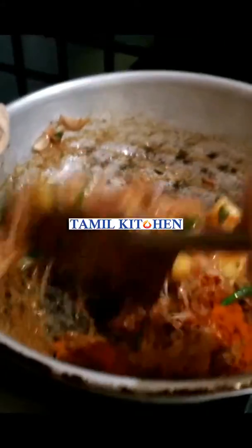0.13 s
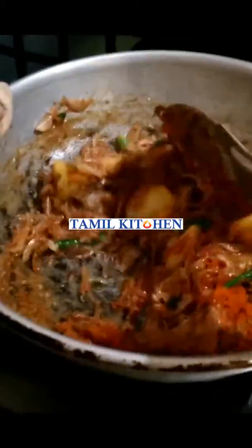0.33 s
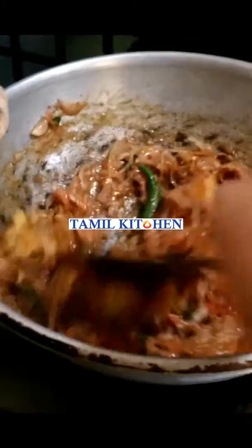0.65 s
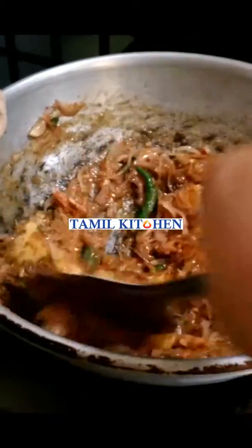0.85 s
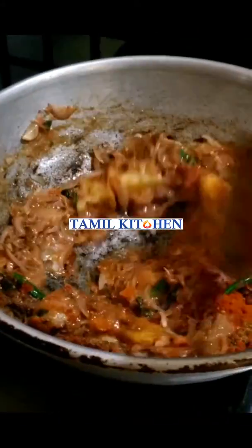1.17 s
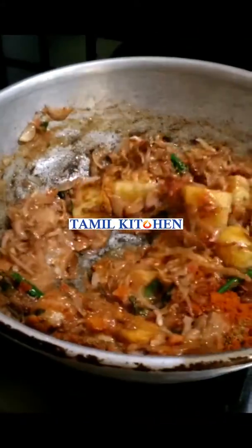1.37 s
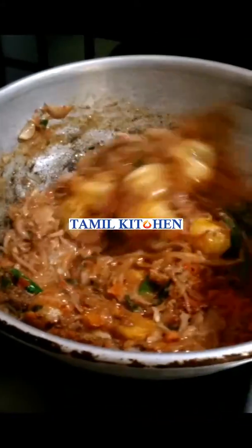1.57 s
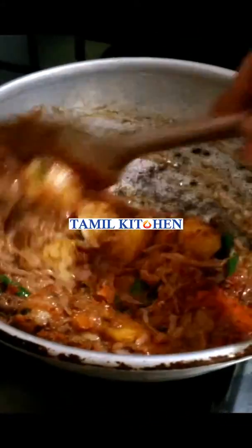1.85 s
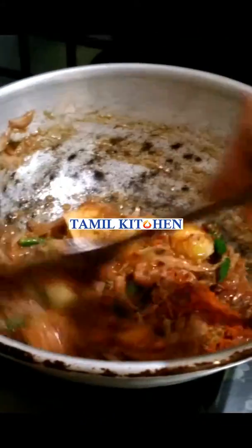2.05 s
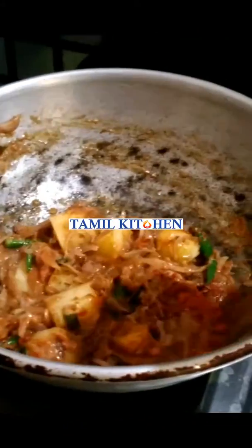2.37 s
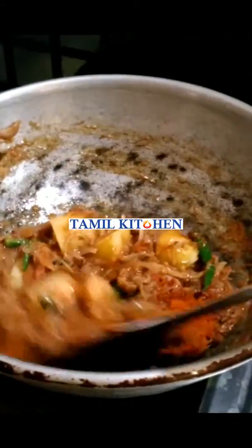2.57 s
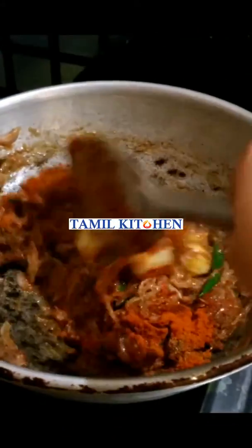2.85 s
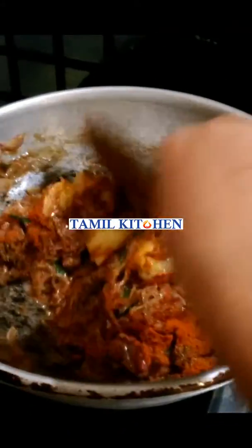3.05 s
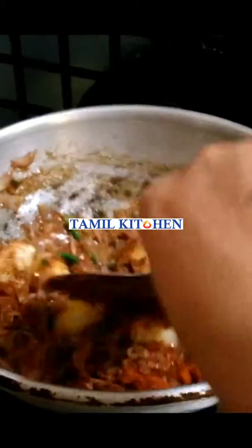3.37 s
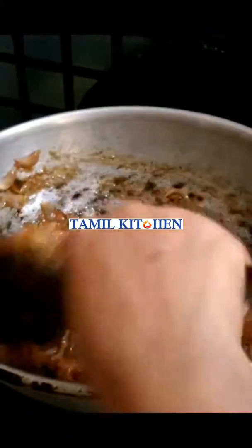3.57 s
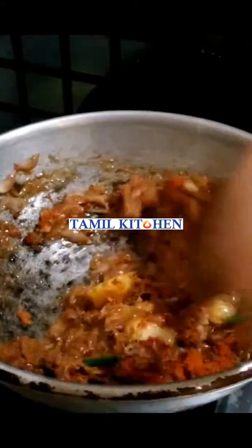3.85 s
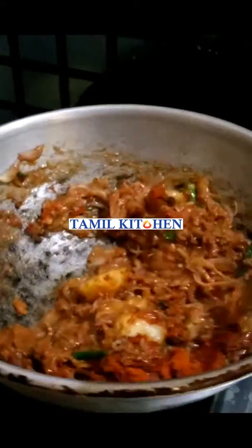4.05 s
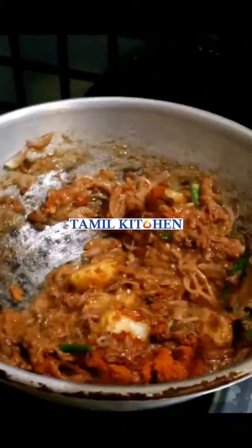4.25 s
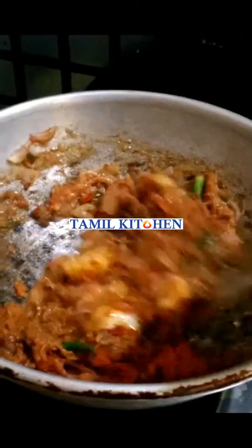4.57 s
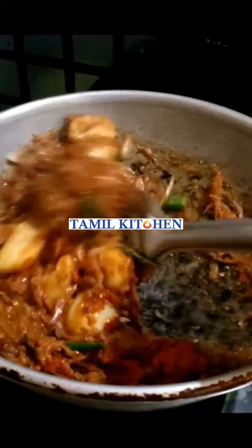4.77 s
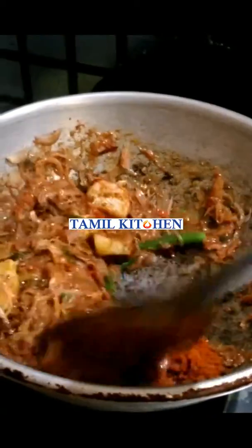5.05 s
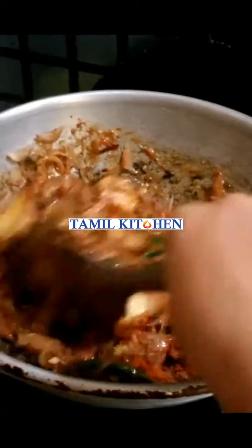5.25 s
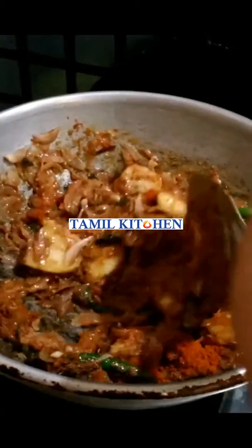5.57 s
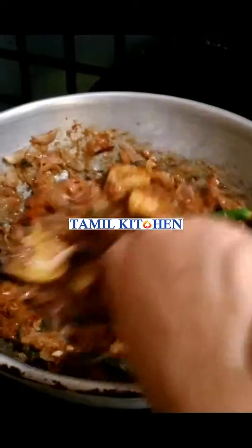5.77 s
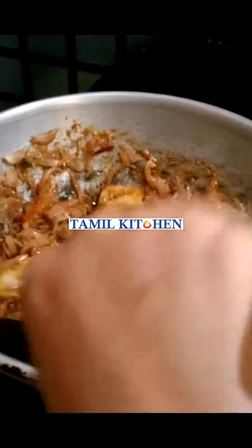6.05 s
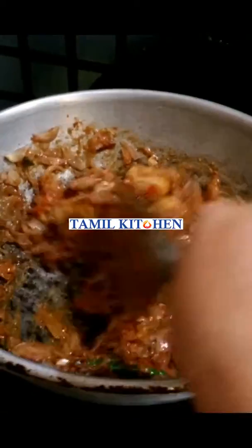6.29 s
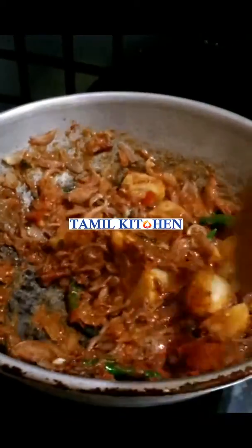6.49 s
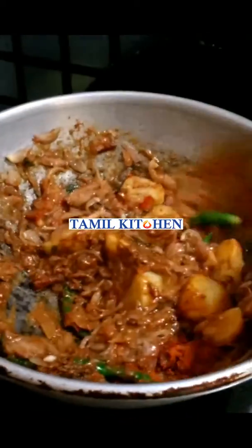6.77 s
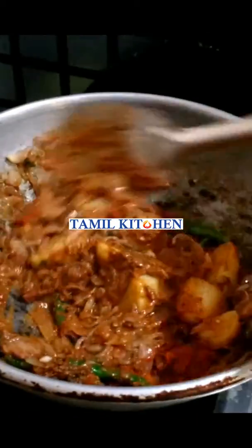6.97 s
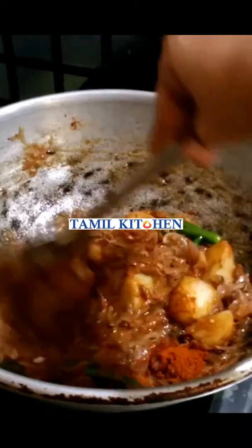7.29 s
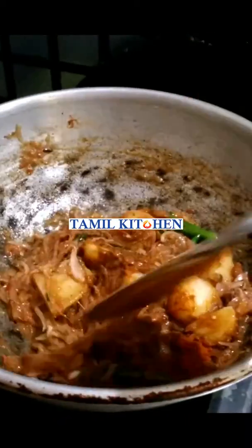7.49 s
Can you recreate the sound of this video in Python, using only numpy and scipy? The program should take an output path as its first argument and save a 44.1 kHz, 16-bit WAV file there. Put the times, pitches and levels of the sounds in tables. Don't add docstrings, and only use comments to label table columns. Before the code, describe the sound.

Close-up stirring of thick, sticky food with a metal ladle in a thin metal pan. Blows ring briefly, damped by the paste, each followed by a rasping drag and a dull shove. Pauses hold only tiny wet sounds and soft burner bumps over quiet room murmur. Later come a sharp knock, a bright cluster of scrapes and some soft thuds, with slight reverberation from hard kitchen walls.

```python
import sys
import numpy as np
from scipy import signal
from scipy.fft import rfft, irfft, next_fast_len
from scipy.io import wavfile
from scipy.ndimage import uniform_filter1d, map_coordinates

SR = 44100
rng = np.random.default_rng(int(sys.argv[2]) if len(sys.argv) > 2 else 0)


def level_to_linear(level):
    exponent = np.asarray(level, float) / 20
    return 10 ** exponent


def unload_wav(signal):
    wavfile.write(
        sys.argv[1],
        SR,
        np.round(np.clip(np.atleast_2d(signal).T, -1, 1) * 32767).astype(np.int16),
    )


N = 336483

# t/s, peak level/dB, bowl thud level/dB, brightest ring f/Hz, tick level/dB
KNOCKS = [(0.5226, -49.5, 16.5, 600, -34), (0.6338, -27, -5, 1130, -35), (0.971, -27, -26, 1850, -24.5),
          (1.01, -25, -15, 3400, -29.5), (1.366, -15.5, -16, 2460, -24.5), (1.3883, -11.5, -16, 2870, -32),
          (1.4208, -18.5, -8, 1120, -21.5), (1.735, -20, -25, 1490, -39), (1.7907, -27.5, -13, 2110, -20.5),
          (2.382, -14, -20, 2620, -27), (2.6436, -23, -23, 2560, -28), (3.1863, -46, -5, 1590, -26),
          (3.268, -43, -11, 1460, -37), (3.5605, -9.5, -18.5, 1470, -25), (4.1219, -17, -27, 2500, -32),
          (4.3449, -18, -12.5, 850, -58.5), (4.4096, -17.5, -10.5, 2340, -44),
          (4.581, -29.5, -12, 2520, -15), (5.036, -43.5, -22.5, 3430, -18.5), (5.356, -30, -12, 3670, -30),
          (5.9683, -36, -11, 900, -23), (6.688, -11.5, -14.5, 2710, -29.5),
          (6.995, -21.5, -34, 3240, -22.5), (7.0368, -15.5, -13.5, 2760, -38)]
# f/Hz, width/Hz, level/dB
BOWL_MODES = [(189, 14, -16), (285.7, 17.5, -3), (343, 16, 0.5), (380, 17, -3.5), (459.5, 40, -2.5),
              (501, 26, -6.5), (547, 59, -4), (634, 58, 1), (713.3, 36, 6), (780, 10.5, -8.5)]
WALL_MODES = [(908, 55, -8), (1017, 140, -8.5), (1099.4, 47, -7.5), (1233, 180, -5)]
RIM_MODES = [(1490, 47, -5.5), (1726, 190, 0), (2015, 94, -6), (2245, 170, -4.5), (2453, 86, -8.5),
             (2540, 9.1, -18.5), (2620, 68, -10.5), (2700, 40, -10.5), (2960, 76, -6.5), (3240, 140, -8),
             (3526, 41, -6), (3704, 44, -9), (4660, 71, -41.5)]
# f/Hz, level per Hz/dB
GRIT_SPECTRUM = [(71, -66.5), (120, -35), (175, -22.5), (295, -0.5), (340, 0.5), (423, -6), (619, -5.5),
                 (835, -12), (1080, -23.5), (1400, -15.5), (3250, 0), (4570, -22), (14300, -42.5)]
# t/s, time to lose 30 dB/s, level/dB, rim centre f/Hz, bare-metal hiss level/dB
DRAGS = [(.633, 0.19, -33.5, 2250, -27), (1.366, 0.2635, -26.5, 2650, -25), (2.382, 0.14, -33, 2700, -18.5),
         (2.63, 0.27, -47.5, 1690, -27), (3.269, 0.35, -60.5, 1500, -19),
         (3.56, 0.1444, -31.5, 1970, -15.5), (4.121, 0.23, -36, 2630, -18.5), (4.343, 0.17, -40, 1720, -46),
         (4.409, 0.2855, -33.5, 2520, -23), (5.969, 0.22, -53, 1600, -12), (6.688, 0.38, -32, 2570, -20.5)]
# peak t/s, fade/s, level/dB, rim centre f/Hz, bare-metal hiss level/dB
SWEEPS = [(.1, 0.19, -70, 1970, -6), (1.018, 0.21, -37, 3170, -14.5), (1.3, 0.4, -67, 2420, -19),
          (1.6, 0.34, -49, 2520, -18), (1.75, 0.3, -43, 1990, -13.5), (1.84, 0.29, -43.5, 2300, -23),
          (2.21, 0.35, -70, 1810, -25), (2.683, 0.22, -37.5, 2420, -14), (3.657, 0.15, -40.5, 3180, -9.5),
          (4.629, 0.25, -33.5, 2690, -17.5), (3.33, 0.18, -67, 2800, -28.5), (5.25, 0.2, -55, 2620, -30.5),
          (5.349, 0.14, -45.5, 3660, -15), (6.229, 0.1, -61.5, 2250, -25), (6.33, 0.56, -72, 2960, -17),
          (6.9, 0.64, -45.5, 2070, -11.5), (7.047, 0.24, -32.5, 3000, -19), (7.17, 0.17, -44.5, 2820, -7),
          (7.25, 0.09, -52.5, 1920, -12)]
# t/s, time to lose 30 dB/s, level/dB, bowl centre f/Hz
LOADS = [(0.521, 0.33, -41.5, 430), (0.635, 0.41, -33.5, 442), (1.37, 0.04, -37, 515),
         (2.38, 0.38, -39.5, 479), (3.269, .5, -52.5, 331), (3.56, 0.2356, -35.5, 430),
         (4.121, 0.34, -52, 354), (4.341, 0.12, -33, 550), (4.411, 0.37, -44.5, 496),
         (5.969, 0.29, -38, 490), (7.037, 0.67, -46, 330), (6.315, 0.7, -57, 373), (6.687, 0.5, -41, 605)]
# peak t/s, swell/s, fade/s, level/dB, bowl centre f/Hz
SHOVES = [(.1, 0.12, 0.89, -63, 508), (1.048, .12, 0.23, -33.5, 472), (1.66, 0.068, 0.43, -48, 496),
          (1.83, 0.17, 0.47, -43, 425), (1.95, 0.3, 0.2, -37.5, 462), (2.3, 0.068, 0.14, -59, 406),
          (2.78, 0.14, 0.16, -47.5, 595), (3.669, 0.13, 0.25, -37.5, 346), (3.9, 0.34, 0.64, -55.5, 295),
          (3.41, 0.25, 0.16, -53.5, 294), (4.325, .08, 0.091, -52, 600), (4.63, 0.086, 0.24, -44.5, 564),
          (4.74, 0.34, .17, -44, 585), (5.12, 0.36, 0.55, -61, 294), (5.365, 0.039, 0.25, -44.5, 414),
          (5.57, .2, 0.1, -62, 338), (6.64, 0.15, 0.12, -60, 390), (6.89, 0.26, 0.46, -46, 537),
          (7.11, 0.14, 0.37, -42.5, 620), (7.25, 0.39, 0.25, -35, 497), (7.5, 0.194, 0.15, -66.5, 327)]
# t/s, length/s, from f/Hz, to f/Hz, level/dB
GLIDES = [
    (0.043, 0.14, 1682, 2080, -55.5),
    (0.935, 0.083, 2100, 1510, -46),
    (1.266, 0.15, 2100, 1770, -57),
    (5.2295, 0.008, 3300, 2950, -38),
    (5.243, 0.016, 3100, 1900, -42),
    (6.198, 0.081, 1900, 1467, -63),
]
# t/s, length/s, f/Hz, width/Hz, level/dB
POCKETS = [(0.15, 0.078, 1390, 130, -71), (1.654, 0.042, 1300, 150, -39), (3.155, 0.086, 287, 37, -53.5),
           (3.24, 0.09, 282, 40, -51), (3.173, 0.052, 1590, 120, -59.5), (3.175, 0.15, 2800, 500, -61),
           (.944, .016, 2300, 1500, -44.5), (1.6, 0.0077, 1900, 1500, -42), (.1, 0.0137, 590, 390, -54),
           (5.235, 0.12, 2450, 1500, -50), (7.466, 0.042, 3700, 320, -69), (1.653, 0.055, 2720, 2060, -43),
           (1.727, 0.054, 2700, 3500, -57), (3.262, 0.06, 4700, 900, -63), (3.565, 0.15, 4000, 1600, -45),
           (6.768, 0.065, 5670, 770, -50.5), (6.96, 0.048, 2500, 3000, -47), (0.022, .04, 2600, 850, -61),
           (.17, .1, 3200, 500, -65), (.39, .02, 3000, 1500, -69), (.583, 0.012, 2600, 2100, -60),
           (1.24, 0.088, 3300, 1200, -68.5), (2.1, 0.099, 1100, 300, -67.5), (2.9, .14, 1710, 330, -67),
           (3.0, .06, 3600, 1200, -70.5), (3.325, .17, 2800, 900, -61), (3.81, 0.088, 1100, 370, -64.5),
           (5.04, .16, 2110, 420, -66), (5.887, .03, 2750, 2300, -63), (5.68, .2, 2500, 1400, -68),
           (5.9, 0.049, 550, 96, -65), (6.33, .11, 3100, 1100, -65), (2.02, .16, 2450, 400, -64),
           (6.05, .12, 2200, 1400, -60.5), (7.085, .17, 625, 40, -44), (7.095, 0.075, 1240, 220, -44),
           (1.5, .27, 650, 200, -48), (5.33, .15, 3100, 1300, -52), (5.345, .11, 640, 400, -52),
           (3.266, .22, 1250, 600, -56)]
# t/s, f/Hz,
# level/dB, t60/s
RINGS = [(.634, 1080, -35.5, 0.081), (.634, 3970, -38.5, .05), (1.366, 2490, -21, 0.22),
         (1.388, 2925, -30, 0.35), (1.421, 1093, -33.5, 0.12), (1.421, 3640, -29, .1),
         (1.43, 3280, -32, .15), (1.92, 377, -37, 0.21), (2.382, 2485, -30, .24), (2.382, 2600, -25, 0.056),
         (2.382, 3206, -30.5, 0.18), (2.382, 3486, -24, 0.11), (2.382, 1111, -31.5, 0.14),
         (2.382, 3750, -38.5, 0.23), (2.382, 2010, -38, .15), (2.382, 4167, -37, .08),
         (3.561, 1065, -26.5, 0.064), (3.561, 3740, -27, 0.055), (3.561, 1390, -25.5, 0.045),
         (3.561, 2306, -29, 0.067), (4.122, 2590, -29, 0.15), (4.122, 1150, -39, .2),
         (4.122, 3490, -37, 0.12), (4.345, 793, -33, 0.17), (4.41, 2390, -30, .08),
         (4.41, 3470, -32.5, .08), (6.689, 2923, -28, .22), (6.689, 2434, -32, 0.16),
         (6.689, 1905, -26, .07), (6.689, 3566, -30.5, 0.11), (7.036, 2680, -26.5, 0.053),
         (7.037, 3250, -29.5, .08), (.485, 600, -60, .05), (.523, 495, -33, .06), (1.02, 380, -36, .2),
         (1.791, 3600, -28, .02), (1.79, 5600, -46, .04), (1.94, 480, -33, .1), (4.345, 350, -33, .2),
         (4.345, 465, -35, .15), (4.345, 1800, -34, .1), (4.345, 2400, -36, .08), (5.357, 3500, -37, .06),
         (7.238, 474, -31, .12), (7.238, 362, -33, .12), (5.972, 385, -36, .2), (5.972, 780, -41, .2),
         (1.078, 640, -33, .06)]
# t/s, peak level/dB, f/Hz
NICKS = [(0.0276, -55, 2550), (0.0684, -47, 1750), (0.105, -43, 1900), (0.5821, -54, 900),
         (0.952, -41, 1780), (1.5996, -39, 3620), (1.7663, -30.5, 1400), (1.8506, -30, 1200),
         (1.9874, -30, 950), (2.0636, -43, 1080), (2.6325, -29, 1630), (3.3204, -42, 1460),
         (4.148, -27, 2520), (4.31, -40, 1140), (4.563, -29, 2500), (4.5908, -24, 3220),
         (4.6187, -31, 3280), (4.8, -35, 2120), (5.251, -37.5, 2090), (5.2752, -45, 2620),
         (5.889, -52.5, 1590), (5.9751, -32, 1118), (6.1374, -43.5, 2160), (6.217, -45, 2580),
         (6.6049, -50, 2320), (6.717, -29, 2970), (6.793, -23, 2660), (6.8568, -24, 1680),
         (6.9084, -41, 2700), (6.9703, -31, 2540), (7.223, -29, 1140), (1.405, -23, 3000),
         (1.449, -23, 2800), (1.75, -31, 2300), (1.815, -31, 3880), (1.853, -33, 2000), (4.504, -24, 2900),
         (4.665, -22, 2700), (5.305, -47, 2100), (6.748, -31, 2050), (7.049, -19, 2920), (7.077, -28, 3300),
         (7.098, -27, 3050), (7.12, -27, 3280)]
# t/s, peak level/dB, f/Hz
LUMPS = [(1.921, -27.5, 526), (2.001, -31.5, 796), (2.03, -39, 446), (2.085, -41, 430), (5.346, -44, 652),
         (5.386, -36.5, 340), (5.434, -41, 518), (6.357, -49, 497), (6.382, -42.5, 380),
         (6.425, -50.5, 416), (6.494, -50, 420), (7.104, -37, 640), (7.144, -32, 636), (7.187, -29, 610),
         (7.197, -26, 695), (7.249, -27, 558)]
# t/s, peak level/dB, f/Hz
BUMPS = [(.1, -60.5, 111), (.635, -38.5, 196.4), (1.221, -60, 128), (1.372, -46.5, 188), (2.28, -62, 95),
         (2.386, -47, 187), (2.828, -62, 91), (3.381, -56.5, 111), (3.432, -58, 134), (3.561, -49.5, 133),
         (3.92, -53.5, 100), (4.564, -53.5, 207), (5.02, -66.5, 78.6), (5.148, -57.5, 197.5),
         (5.545, -58, 160), (6.565, -59, 153), (6.634, -50, 182), (7.102, -48, 182), (7.471, -56, 187),
         (3.48, -57.5, 188), (3.925, -64, 60), (4.23, -66, 60)]
# f/Hz, t60/s
KITCHEN_T60 = [(200, 0.49), (1000, 0.48), (3000, 0.21), (8000, 0.46)]
# f/Hz, level per Hz/dB
AIR_SPECTRUM = [(15, -74.5), (25, -26), (92, -4.5), (123, -14), (161, 0), (239, -2.5), (296, -4),
                (418, -35), (590, -11.5), (903, -19), (1310, -21.5), (2540, -19), (5800, -29),
                (14300, -30.5)]
# f/Hz, level/dB
FRIDGE_HUM = [(100, -82.5), (194, -86.5)]
# f/Hz, level difference/dB
PAN_SHADE = [(60, 0.6), (110, 0.02), (200, -0.5), (370, 0.2), (680, 0.53), (1240, -5.0), (2270, -13.5),
             (4160, -15.0), (7620, -6.0), (14000, -5.0)]
AIR_SHADE = [(60, 5.5), (110, -1.5), (200, 0.5), (370, 0), (680, 3), (1240, -1), (2270, -9.5), (4160, 5),
             (7620, 1), (14000, -2)]
# f/Hz, coherence (held within 0-1)
PORT_LIKENESS = [(60, 0.83), (130, 0.86), (280, 0.88), (620, 0.54), (1350, -1.5), (2940, -0.21),
                 (6410, -0.33), (14000, -0.4)]

STEP = 32
LANDING_S, SWELL_SHARE = 0.004, 0.38
DRAG_ROUND, SWEEP_ROUND, LOAD_ROUND, SHOVE_ROUND = 1.19, 1.525, 0.94, 1.14
HISS_STEEP, WALL_STEEP = 1.01, 1.03
BOWL_REST_HZ, RIM_REST_HZ = 430, 2300
WALL_FROM_EDGE_DB, EDGE_DB_PER_OCT = -11, -16
WALL_FROM_BOWL_DB, BOWL_DB_PER_OCT = -16.5, 14.5
GLIDE_WIDTH = 0.28
NICK_DB, NICK_CYCLES, NICK_GRIT_DB = -3.5, 43, -14
LUMP_CYCLES = 24
RING_ROUGH, RING_FLUTTER_DB = 1.2, 4
TOP_HZ = 14300


def scrape():
    drag, sweep, load, shove = [np.transpose(rows) for rows in (DRAGS, SWEEPS, LOADS, SHOVES)]
    landing = LANDING_S + 0 * drag[0]
    sweep_swell = SWELL_SHARE * sweep[1]
    edge = np.vstack([loss_db(drag[0], landing, drag[1], DRAG_ROUND),
                      loss_db(sweep[0], sweep_swell, sweep[1], SWEEP_ROUND)])
    heap = np.vstack([loss_db(load[0], LANDING_S + 0 * load[0], load[1], LOAD_ROUND),
                      loss_db(*shove[:3], SHOVE_ROUND)])
    edge_db, edge_hz, dry_db = np.hstack([drag, sweep])[-3:, :, None] if len(drag) == len(sweep) else None
    heap_db, heap_hz = np.hstack([load[-2:], shove[-2:]])[:, :, None]

    bowl_gain, bowl_hz = summed(heap_db + heap, -73.5, heap_hz[:, 0], BOWL_REST_HZ)
    rim_gain, rim_hz = summed(edge_db + edge, -71, edge_hz[:, 0], RIM_REST_HZ)
    hiss_gain = summed(edge_db + dry_db + HISS_STEEP * edge, -86)
    edge_octaves = np.log2(edge_hz / RIM_REST_HZ)
    heap_octaves = np.log2(heap_hz / BOWL_REST_HZ)
    from_edge = edge_db + WALL_FROM_EDGE_DB + EDGE_DB_PER_OCT * edge_octaves + WALL_STEEP * edge
    from_heap = heap_db + WALL_FROM_BOWL_DB + BOWL_DB_PER_OCT * heap_octaves + WALL_STEEP * heap
    wall_gain = summed(np.vstack([from_edge, from_heap]), -81.5)

    bowl = shaken(grit(slips=110, spike_db=-10), BOWL_MODES, 250, 800, -2, bowl_hz, spread=0.26)
    wall = shaken(grit(slips=90, spike_db=-3), WALL_MODES, 850, 1400, 2)
    rim = shaken(grit(slips=130, spike_db=-3), RIM_MODES, 1400, 5200, 0, rim_hz, spread=0.33, depth_db=5)
    hiss = shaken(grit(slips=120, spike_db=-1), [], 4500, 15000, 0, depth_db=3.5)
    low = level_to_linear(-3.5) * bowl_gain * bowl + level_to_linear(2.5) * wall_gain * wall
    return low + level_to_linear(-4.0) * rim_gain * rim + level_to_linear(1.0) * hiss_gain * hiss


def loss_db(s, swell, fade, curve):
    t = np.arange(0, N, STEP) / SR - s[:, None]
    u = np.where(t < 0, -t / swell[:, None], t / fade[:, None])
    return -30 * u ** curve


def summed(db, rest_db, hz=None, rest_hz=None):
    power = level_to_linear(2 * db)
    rest = level_to_linear(2 * rest_db)
    total = power.sum(0) + rest

    def full(v):
        return np.interp(np.arange(N), np.arange(len(v)) * STEP, v)

    gain = full(np.sqrt(total))
    if hz is None:
        return gain
    return gain, full((hz @ power + rest_hz * rest) / total)


def grit(slips, spike_db):
    size = level_to_linear(2.7 * np.minimum(rng.exponential(size=N), 2.5))
    catch = (rng.random(N) < slips / SR) * size
    bursts = signal.lfilter([1], [1, -np.exp(-1 / (0.0013 * SR))], catch)
    return (1 + level_to_linear(spike_db) * bursts) * level_to_linear(2.96 * wobble(25)) * rng.standard_normal((2, N))


def shaken(force, modes, low_hz, high_hz, between_db, centre_hz=None, spread=0.25, depth_db=4):
    def near(hz, at):
        if centre_hz is None:
            return 1
        return 0.09 + np.exp(-0.5 * (np.log(centre_hz[at] / hz) / spread) ** 2)

    drive = filtered(force, lambda f: band(f, low_hz, high_hz))
    coloured = filtered(force, lambda f: band(f, low_hz, high_hz) * level_to_linear(along(GRIT_SPECTRUM, f)))
    out = level_to_linear(between_db) * unit(patchy(coloured, depth_db, near))
    at = np.arange(0, N, 64)
    for hz, width_hz, db in modes:
        gain = level_to_linear(db + 4.4 * wobble(16)[at]) * near(hz, at)
        mode = unit(signal.lfilter(*signal.iirpeak(hz, hz / width_hz, SR), drive))
        out += np.interp(np.arange(N), at, gain) * mode
    steady = uniform_filter1d(np.mean(out ** 2, 0), SR // 12)
    return out / np.sqrt(np.abs(steady) + 1e-9)


def patchy(x, depth_db, near=1):
    hz, t, z = signal.stft(x, SR, nperseg=512)
    field = uniform_filter1d(uniform_filter1d(rng.standard_normal(z.shape[1:]), 4, 0), 4, 1)
    weight = near
    if callable(near):
        weight = near(hz[:, None] + 1, np.minimum((t * SR).astype(int), N - 1))
    return signal.istft(z * level_to_linear(depth_db * unit(field)) * weight, SR, nperseg=512)[1][:, :N]


def knocks():
    out, cracks, ticks = np.zeros((3, 2, N + SR))
    t = np.arange(SR // 6) / SR
    c, w, own_db = np.transpose(WALL_MODES + RIM_MODES + BOWL_MODES)
    decay = np.pi * (0.95 * w + 5)
    waves = np.exp(np.outer(2j * np.pi * c - decay, t)) * (1 - np.exp(-t / 0.0012))
    upper = np.arange(len(c)) < len(WALL_MODES + RIM_MODES)
    for s, db, thud_db, hz, tick_db in KNOCKS:
        level_db = np.where(upper, -4.5 - 12 * np.abs(np.log2(c / hz)), thud_db - 12.5)
        luck = rng.standard_normal((2, 2, len(c)))
        ring = np.imag(level_to_linear(own_db + level_db + 2.7 * luck[0]) * np.exp(0.97j * luck[1]) @ waves)
        add_at(out, s, level_to_linear(db) * ring)
        click = between(rng.standard_normal((2, len(t))), 2, hz / 1.5, hz * 2.4)
        crack_fade = level_to_linear(db - 60 * t / 0.026) + level_to_linear(db + 0.5 - 60 * t / 0.007)
        add_at(cracks, s, crack_fade * unit(click))
        top = level_to_linear(-60 * t / 0.046) * (1 - np.exp(-t / 0.0007)) + level_to_linear(3 - 60 * t / 0.0045)
        add_at(ticks, s, level_to_linear(db + tick_db) * top * rng.standard_normal((2, len(t))))

    def bright(f):
        return level_to_linear(along(GRIT_SPECTRUM, f) - along(GRIT_SPECTRUM, 4340)) * band(f, 4200, 15000)

    body = filtered(out[:, :N] + level_to_linear(-13.0) * cracks[:, :N], lambda f: band(f, 190, 3540))
    return body + level_to_linear(7.5) * filtered(ticks[:, :N], bright)


def rings():
    out, t = np.zeros((2, N + SR)), np.arange(SR // 4) / SR
    flutter = np.pad(wobble(70), (0, SR))
    grains = [(s, hz, db + NICK_DB, NICK_CYCLES / hz) for s, db, hz in NICKS]
    lumps = [(s, hz, db, LUMP_CYCLES / hz) for s, db, hz in LUMPS]
    for s, hz, db, t60 in RINGS + grains + lumps:
        wander = RING_ROUGH * np.cumsum(rng.standard_normal(len(t))) / np.sqrt(SR / 100)
        shake_db = RING_FLUTTER_DB * flutter[rng.integers(N):][:len(t)] * np.minimum(t / 0.028, 1)
        envelope = level_to_linear(db + shake_db - 60 * t / t60) * (1 - np.exp(-t * hz / 1.42))
        add_at(out[0], s, envelope * np.sin(2 * np.pi * hz * t + wander))
    for s, db, hz in NICKS:
        fade = level_to_linear(db + NICK_GRIT_DB - 60 * t / 0.033)
        rasp = fade * rng.standard_normal((2, len(t))) * np.sqrt(SR / 2 / hz)
        add_at(out, s, between(rasp, 3, hz / 1.41, hz * 1.44))
    return filtered(out[:, :N], lambda f: band(f, 285, 5800))


def squelches():
    out, scratch = np.zeros((2, N + SR)), wobble(90)
    rows = [(s, n, a, b, GLIDE_WIDTH * a, db) for s, n, a, b, db in GLIDES]
    rows += [(s, n, a, a, w, db) for s, n, a, w, db in POCKETS]
    for s, length, from_hz, to_hz, width_hz, db in rows:
        n = round(length * SR)
        u = np.arange(n) / n
        turn = 2 * np.pi * np.cumsum(from_hz * (to_hz / from_hz) ** u) / SR
        low_pass = signal.butter(3, width_hz / 2, fs=SR, output="sos")
        flutter = signal.sosfilt(low_pass, rng.standard_normal((2, 2, SR // 2)))[..., -n:]
        flutter = unit(flutter) + 18 / width_hz
        tear = level_to_linear(np.clip(width_hz / 120, 0, 3.5) * scratch[round(s * SR):][:n])
        swell = (1 - np.exp(-u / 0.19)) * (1 - u ** 2) * tear
        tone = unit(flutter[0] * np.cos(turn) + flutter[1] * np.sin(turn))
        add_at(out, s, level_to_linear(db) * swell * tone)
    return out[:, :N]


def bumps():
    out, t = np.zeros((2, N + SR)), np.arange(SR // 5) / SR
    for s, db, hz in BUMPS:
        turn = 2 * np.pi * hz * t + [[0], [rng.uniform(0, 2 * np.pi)]]
        add_at(out, s, level_to_linear(db - 60 * t / 0.19) * (1 - np.exp(-t / 0.0058)) * np.sin(turn))
    return out[:, :N]


def kitchen(x):
    hz, t, z = signal.stft(rng.standard_normal((2, SR // 2)), SR, nperseg=256)
    decay = level_to_linear(-60 * t / along(KITCHEN_T60, hz)[:, None])
    tail = signal.istft(z * decay, SR, nperseg=256)[1]
    late = np.pad(x, ((0, 0), (250, 0)))
    return signal.fftconvolve(late, tail / np.linalg.norm(tail[0]), axes=1)[:, :N]


def ports(pair, shade):
    m = next_fast_len(N + SR // 4)
    hz, z = np.fft.rfftfreq(m, 1 / SR), rfft(pair, m)
    turn = np.arccos(np.clip(along(PORT_LIKENESS, hz), 0, 1)) / 2
    lean = level_to_linear(along(shade, hz))
    mid, side = z[0] * np.cos(turn), z[1] * np.sin(turn)
    left_right = np.array([(mid + side) * lean, mid - side])
    return irfft(left_right * 2 / np.sqrt(1 + lean ** 2), m)[:, :N]


def air():
    pair = patchy(rng.standard_normal((2, N)), depth_db=3.0)
    hush = ports(unit(filtered(pair, lambda f: level_to_linear(along(AIR_SPECTRUM, f)))), AIR_SHADE)
    t = np.arange(N) / SR
    hum = sum(level_to_linear(db + 2.4 * wobble(3.9)) * np.sin(2 * np.pi * hz * t) for hz, db in FRIDGE_HUM)
    return level_to_linear(-72.5) * hush + hum


def unit(x):
    return x / np.sqrt(np.mean(x ** 2) + 1e-20)


def along(points, hz):
    f, v = np.transpose(points)
    return np.interp(np.log(hz + 1), np.log(f + 1), v)


def wobble(rate):
    at = np.arange(0, N + STEP, STEP)
    knots = rng.standard_normal(int(N * rate / SR) + 4)
    return np.interp(np.arange(N), at, map_coordinates(knots, [at * rate / SR]))


def filtered(x, response):
    m = next_fast_len(N + SR // 4)
    return irfft(rfft(x, m) * response(np.fft.rfftfreq(m, 1 / SR)), m)[..., :N]


def band(hz, low_hz, high_hz):
    return 1 / np.sqrt((1 + (low_hz / (hz + 1)) ** 8) * (1 + (hz / high_hz) ** 8))


def between(x, order, low_hz, high_hz):
    return signal.sosfilt(signal.butter(order, [low_hz, high_hz], "band", fs=SR, output="sos"), x)


def add_at(out, s, sound):
    out[..., round(s * SR):][..., :sound.shape[-1]] += sound


def scene():
    blows = knocks() + rings()
    drag = scrape() + squelches()
    room = kitchen(level_to_linear(-5.0) * blows + level_to_linear(-15) * drag)
    return ports(blows + drag + bumps() + room, PAN_SHADE) + air()


def roll_off(x):
    return signal.sosfilt(signal.butter(12, 14570, fs=SR, output="sos"), x)


def record(dry):
    limited = filtered(dry, lambda hz: hz < TOP_HZ)
    return roll_off(limited)


dry = scene()
out = record(dry)
unload_wav(out)
```